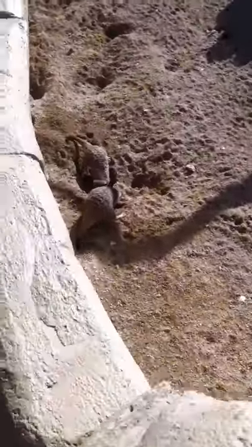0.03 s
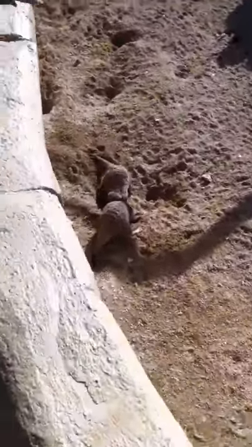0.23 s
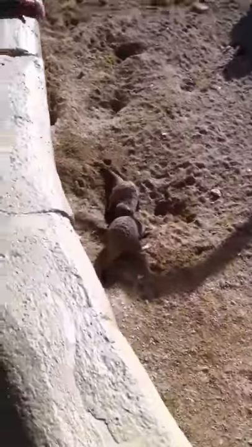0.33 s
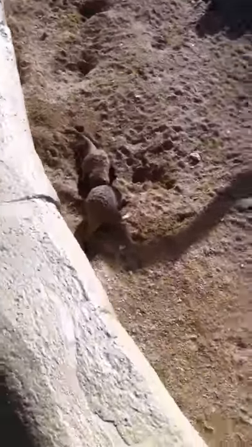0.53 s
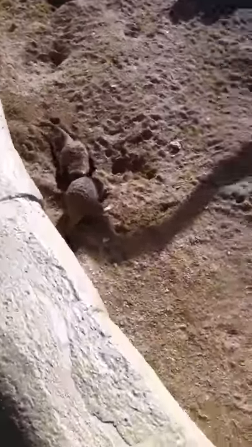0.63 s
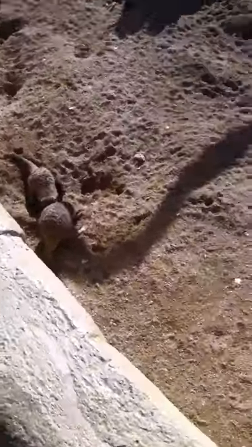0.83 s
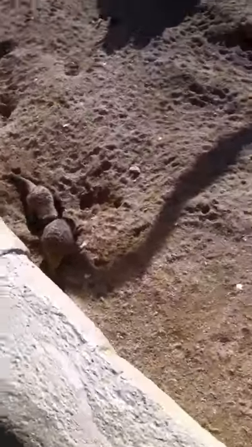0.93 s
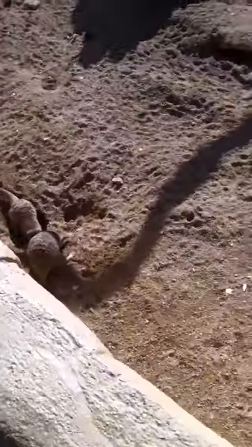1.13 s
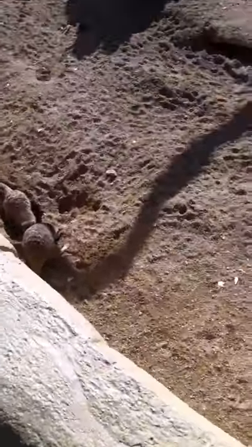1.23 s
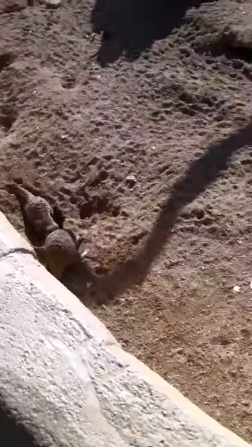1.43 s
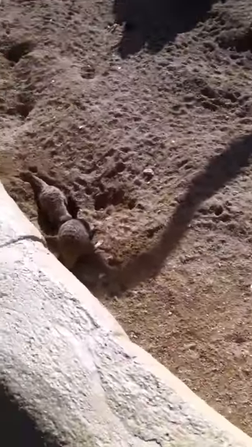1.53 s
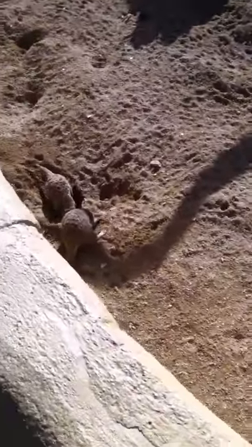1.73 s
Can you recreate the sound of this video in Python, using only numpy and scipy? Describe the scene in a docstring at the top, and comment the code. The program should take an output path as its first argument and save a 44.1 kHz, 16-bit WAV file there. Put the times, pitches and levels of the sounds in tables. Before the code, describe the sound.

Dull, close thumps of fingers bumping a hand-held camera start at once, with the loudest at about 0.25 seconds and a few more around 0.6. After a lull they return from 1.2 seconds, peaking again near 1.5. A faint low wind rumble and steady hiss run underneath throughout. From about 0.8 to 1.5 seconds, meerkats' paws scrape very faintly in the sand.

```python
"""Short, dull thumps come from a hand-held camera as shifting fingers bump its case.
Light wind and the holding hand keep up a low tremor. Below the wall, meerkats dig in the sand
of a quiet enclosure. Their paws scrape faintly under the wash of the open air, the microphone's
hiss and a thin whine from the electronics."""
import sys
import numpy as np
from scipy.fft import rfft, irfft, next_fast_len
from scipy.io import wavfile
from scipy.ndimage import map_coordinates

SR = 44100
rng = np.random.default_rng(int(sys.argv[2]) if len(sys.argv) > 2 else 0)


def master_out(mix):
    """Clip the mix to full scale and print it as 16-bit PCM to the path in sys.argv[1]."""
    frames = np.transpose(np.atleast_2d(mix))
    ceiling = np.clip(frames, -1, 1)
    pcm = np.round(ceiling * 32767).astype(np.int16)
    wavfile.write(sys.argv[1], SR, pcm)


N = 79380  # 1.8 seconds
TIME_S = np.arange(N) / SR


def gain(db):
    """Turn decibels into a number to multiply a sound by."""
    return 10 ** (np.asarray(db) / 20)


def normalize(sound):
    """Scale a sound so that its average strength (rms) is 1."""
    return sound / np.sqrt(np.mean(sound ** 2) + 1e-20)


def wobble(rate_hz):
    """A smooth curve through rate_hz random values a second."""
    values = rng.standard_normal(int(N * rate_hz / SR) + 4)
    return map_coordinates(values, [np.arange(N) * rate_hz / SR])


def filtered(sound, response):
    """Turn each frequency of a sound up or down by response(frequency)."""
    size = next_fast_len(N + 8192)
    return irfft(rfft(sound, size) * response(np.fft.rfftfreq(size, 1 / SR)), size)[:N]


def shaped_noise(tone):
    """Noise of strength 1 whose mix of low and high follows (pitch_hz, relative_db) rows."""
    hz, db = np.transpose(tone)
    white = rng.standard_normal(N)
    return normalize(filtered(white, lambda f: gain(np.interp(np.log(f + 1), np.log(hz), db))))


# The tremor's mix of low and high. Columns: pitch_hz, relative_db
TREMOR_TONE = [(20, -36.5), (50, -8), (90, -5.5), (150, 3), (220, -5), (320, -11), (500, -19.5),
               (900, -27.5), (2500, -68)]
# How the tremor swells and fades. Columns: time_s, level_db
TREMOR_LOUDNESS = [(0, -67.5), (.15, -67), (.3, -67.5), (.52, -67.5), (.8, -66.5), (1.05, -63.5),
                   (1.15, -70), (1.32, -62), (1.55, -64), (1.72, -62.5), (1.8, -67.5)]

def case_tremor():
    """Light wind and the holding hand keep the case trembling unevenly."""
    level_db = np.interp(TIME_S, *np.transpose(TREMOR_LOUDNESS))
    rumble = shaped_noise(TREMOR_TONE)
    flutter_db = -0.5 * wobble(rate_hz=25.2)
    return gain(level_db) * normalize(rumble * gain(flutter_db))


# The outdoor air's mix of low and high. Columns: pitch_hz, relative_db
AIR_TONE = [(20, -28), (200, -1.5), (500, 3), (900, -1), (1500, -3), (3000, -8.5), (6000, -11.5),
            (15000, -55)]

def open_air(level_db=-74.5):
    """The outdoors makes a faint, even wash of noise."""
    return gain(level_db) * shaped_noise(AIR_TONE)


# Finger pushes on the case. Columns: time_s, peak_db, brightness_hz, damping_factor
PUSHES = [(.001, -37.5, 70, 2.7), (0.049, -29, 109, 0.78), (.133, -53, 44.4, 1.4),
          (0.175, -47.5, 62.5, 1.3), (0.19, -51, 131.5, 2.2), (0.2425, -15, 200, 0.91),
          (0.2996, -54, 65, 1.1), (.3403, -49.5, 64, 2.2), (0.3569, -49.5, 76, 1.6),
          (0.4299, -46, 49.7, .7), (0.5614, -35.5, 91, 0.49), (0.5685, -29, 119, 0.92),
          (0.6121, -39, 68.4, 1.5), (0.621, -27.5, 144, 0.79), (.881, -53, 79, 1.4),
          (.93, -52.5, 64.6, 1.2), (1.0704, -50, 130, 0.84), (1.0805, -39, 74, 0.95),
          (1.2307, -33, 74, 1.3), (1.3425, -42, 65, 1.5), (1.3769, -40, 58, 3), (1.398, -46.5, 69, 2.1),
          (1.431, -47, 79, 1.9), (1.48, -49.5, 80, 1.5), (1.5135, -30, 60, 1.4), (1.5399, -22, 93.4, 0.82),
          (1.5481, -33.5, 134, 0.85), (1.6136, -51.5, 80, 0.57), (1.6826, -40, 89, 0.66),
          (1.7418, -61, 59, 1.7), (1.7759, -50.5, 72, 1.2)]
# Pitches at which the case rings; a wider one dies away sooner. Columns: pitch_hz, width_hz
CASE_RINGS = [(218, 358), (163.4, 91)]
# The mix of low and high in skin rubbing on the case. Columns: pitch_hz, relative_db
SCUFF_TONE = [(150, -15), (400, 2.5), (700, -6.5), (1100, -12.5), (2000, -19.5), (4000, -38), (9000, -60)]

def finger_thumps(fingertip_hz=1046, scuff_vs_peak_db=-37, scuff_fade_s=0.0075):
    """Each push rocks the case for a cycle or two; the finger damps it and scuffs a little."""
    size = 8192  # samples in one thump, with the push in the middle
    f = np.fft.rfftfreq(size, 1 / SR)
    soft_fingertip = np.exp(-(f / fingertip_hz) ** 2)  # passes little of the highs
    thumps, scuff_level = np.zeros(N + 2 * size), np.zeros(N)
    for time_s, peak_db, brightness_hz, damping in PUSHES:
        rings = [f * f / (hz * hz - f * f + 1j * f * width * damping) for hz, width in CASE_RINGS]
        case = np.prod(rings, axis=0)
        rolloff = np.exp(-f / brightness_hz)
        push = rolloff / (1 + rolloff ** 2)  # the frequencies in one smooth pulse
        thump = np.fft.fftshift(irfft(case * soft_fingertip * push))
        thumps[round(time_s * SR):][:size] += gain(peak_db) * thump / np.abs(thump).max()
        fade = (TIME_S >= time_s) * np.exp(-np.abs(TIME_S - time_s) / scuff_fade_s)
        scuff_level += gain(peak_db + scuff_vs_peak_db) * fade
    return thumps[size // 2:][:N] + scuff_level * shaped_noise(SCUFF_TONE)


# Faint scrapes of paws in the sand or of the grip.
# Columns: middle_s, length_s, level_db, pitch_hz, width_octaves
SCRAPE_STROKES = [(0.007, 0.013, -60.5, 606, 0.52), (0.828, 0.017, -68.5, 765, 0.38),
                  (0.876, 0.0096, -61.5, 491, 0.84), (.958, 0.052, -73, 596, 0.43),
                  (1.014, 0.0073, -64.5, 540, 0.31), (1.076, 0.012, -67, 585, 0.4),
                  (1.227, 0.0061, -62, 610, .5), (1.312, 0.014, -71, 2380, 1),
                  (1.35, 0.092, -74, 590, 0.71), (1.506, 0.0066, -67, 584, 0.39),
                  (1.539, .004, -65, 2000, 2.6), (1.541, 0.0097, -59.5, 614, 0.31)]

def digging(grit_db=3):
    """Each paw stroke through the sand is a brief, gritty swell of noise."""
    scrapes = np.zeros(N)
    for middle_s, length_s, level_db, pitch_hz, width_octaves in SCRAPE_STROKES:
        grit = rng.standard_normal(N) * gain(grit_db * wobble(rate_hz=300))
        sand = filtered(grit, lambda f: np.exp(-(np.log2((f + 1) / pitch_hz) / width_octaves) ** 2))
        swell = np.exp(-2 * ((TIME_S - middle_s) / length_s) ** 2)
        scrapes += gain(level_db) * normalize(sand) * swell
    return scrapes


def scene():
    """Close thumps and tremor sit over the distant digging and the open air, in one channel."""
    return (finger_thumps() + case_tremor() + digging() + open_air())[None]


# The microphone hiss's mix of low and high. Columns: pitch_hz, relative_db
HISS_TONE = [(100, -7.5), (2000, 2), (5000, 1), (7200, 0), (8500, -1), (9500, -0.5), (10600, -2),
             (12500, -0.5), (14000, 0), (15500, 1)]

def record(dry, hiss_db=-70.5, whine_db=-95, whine_hz=15000, highest_hz=15850):
    """The camera adds hiss and a thin electronic whine, and keeps nothing above highest_hz."""
    hiss = gain(hiss_db) * shaped_noise(HISS_TONE)
    whine = gain(whine_db) * np.sqrt(2) * np.sin(2 * np.pi * whine_hz * TIME_S)
    return filtered(dry[0] + hiss + whine, lambda f: f < highest_hz)[None]


dry = scene()
out = record(dry)
master_out(out)
```